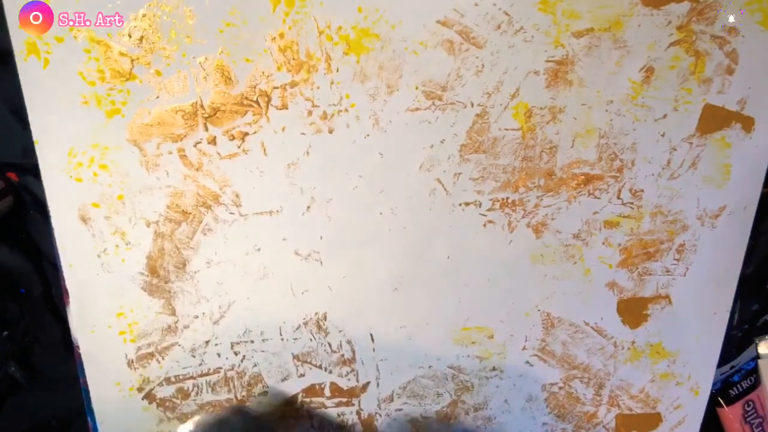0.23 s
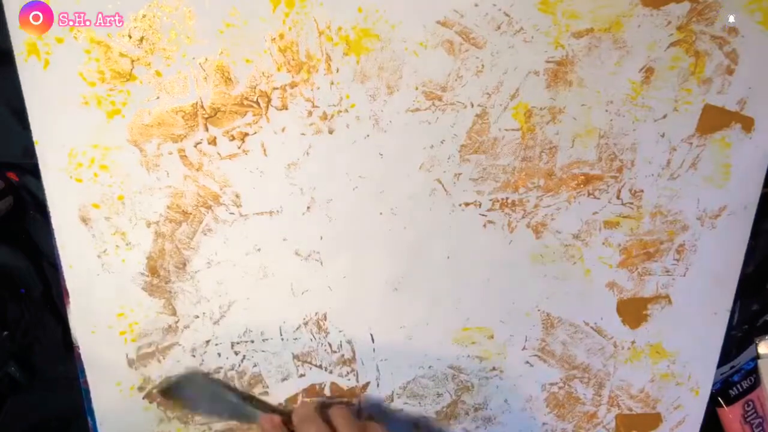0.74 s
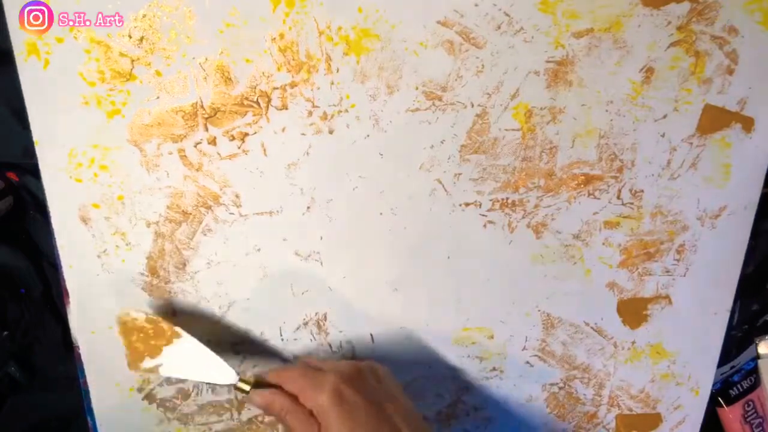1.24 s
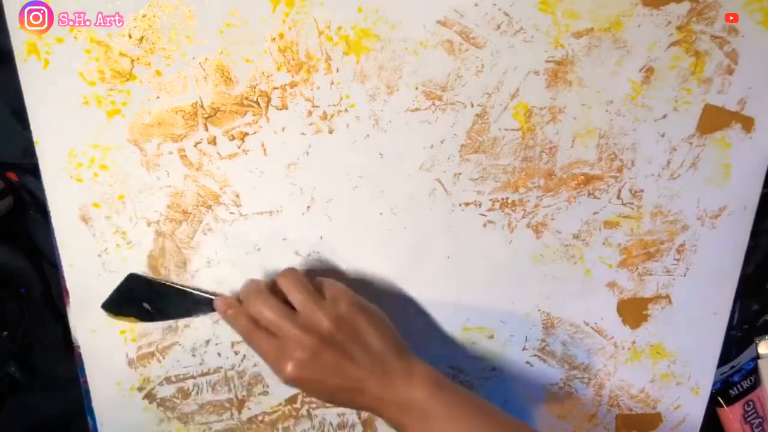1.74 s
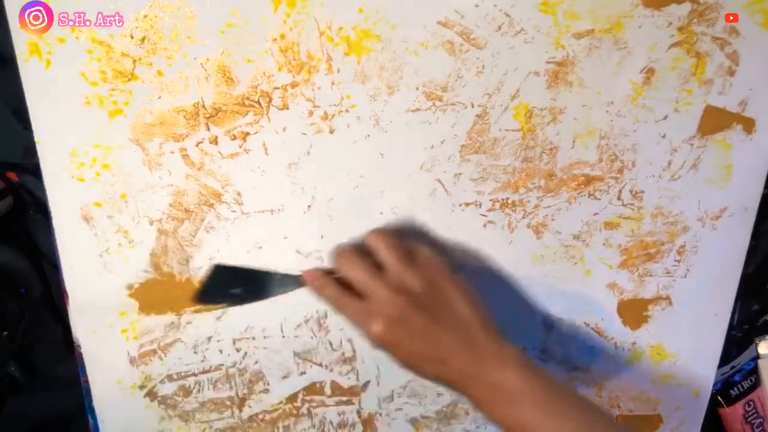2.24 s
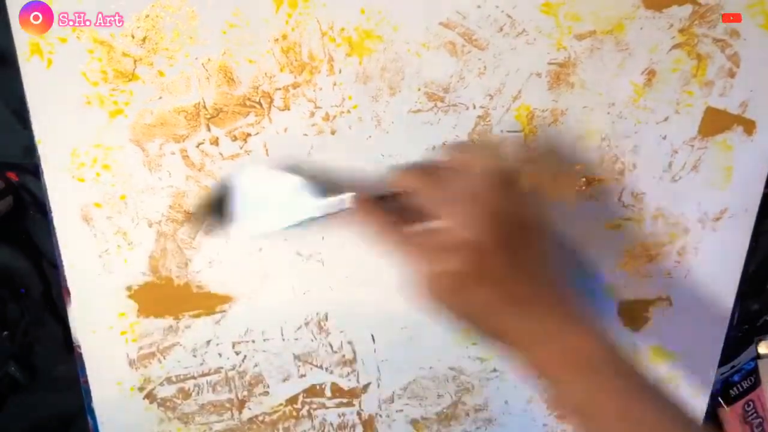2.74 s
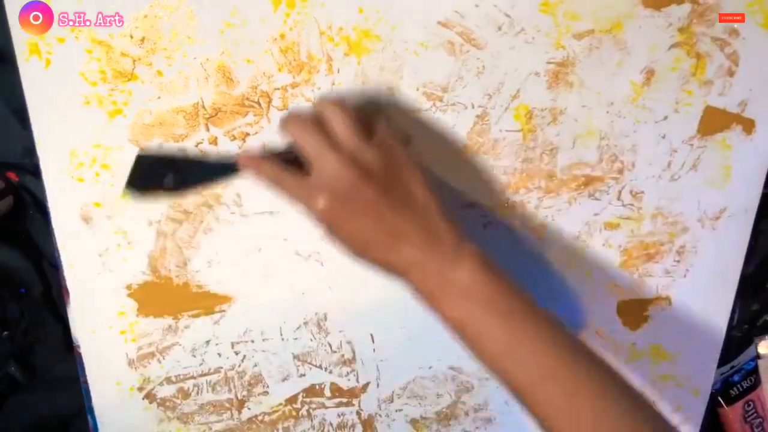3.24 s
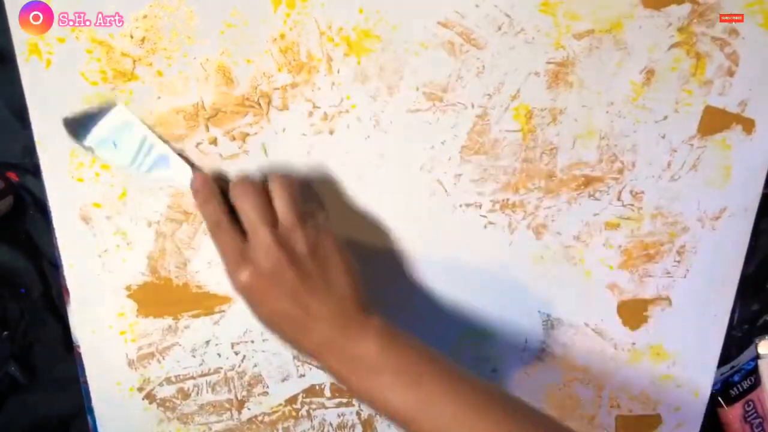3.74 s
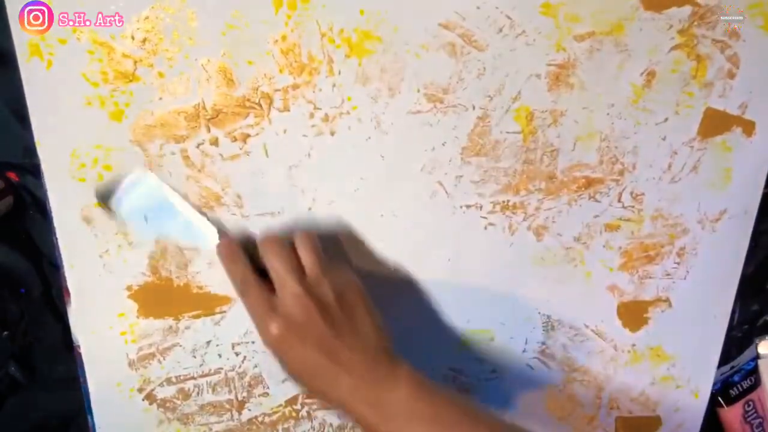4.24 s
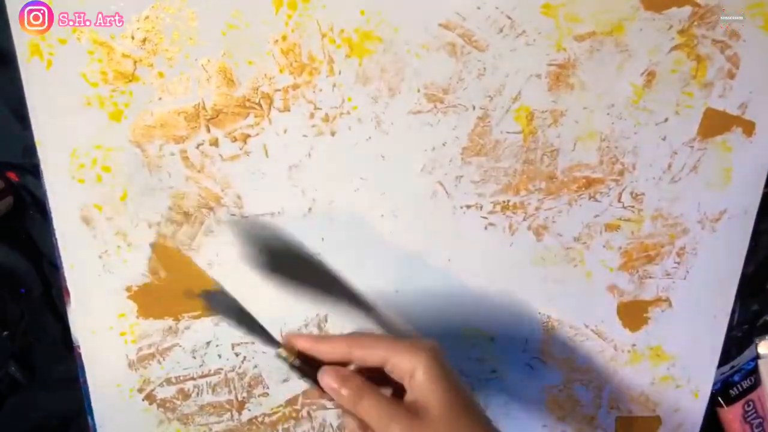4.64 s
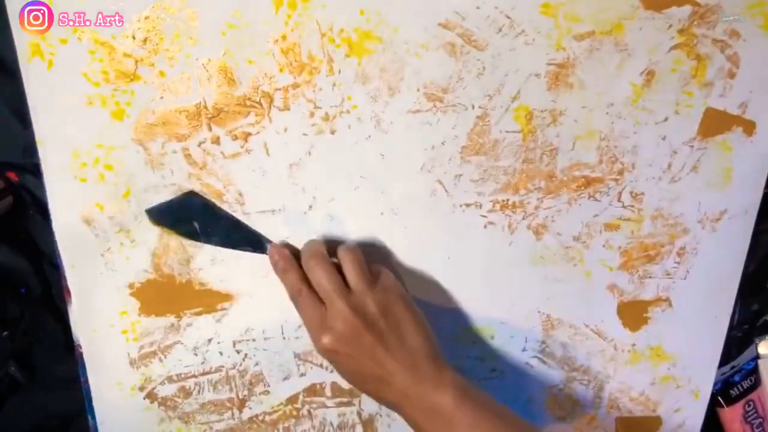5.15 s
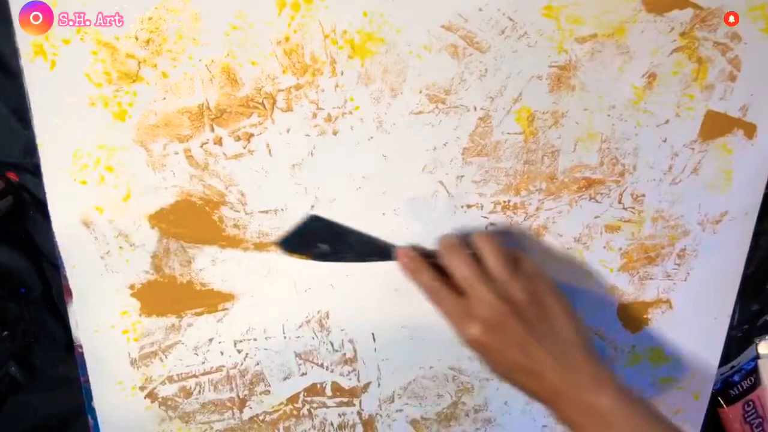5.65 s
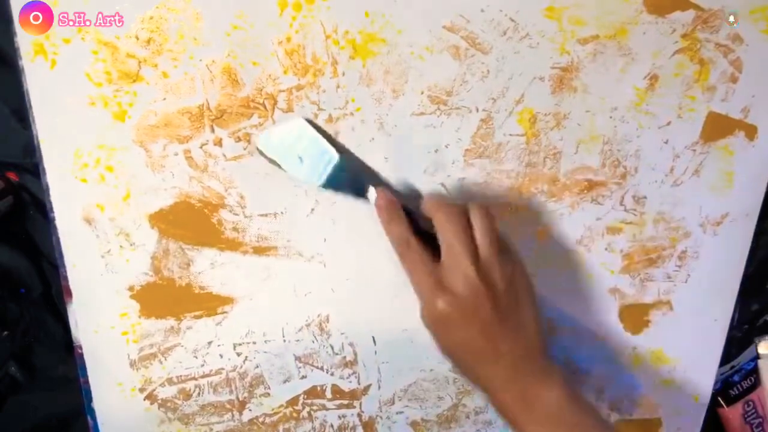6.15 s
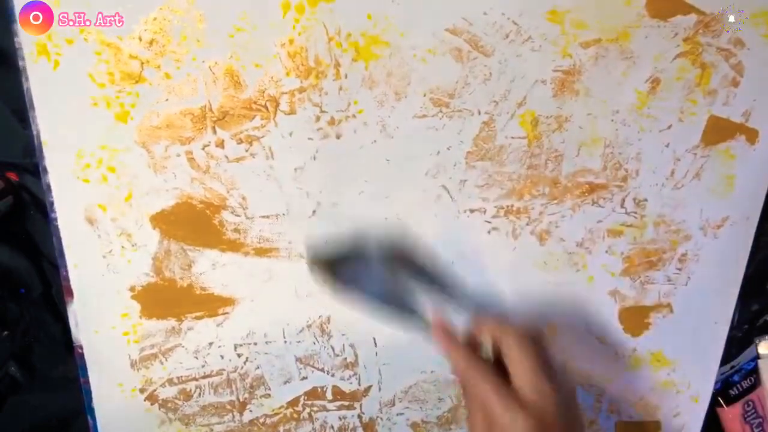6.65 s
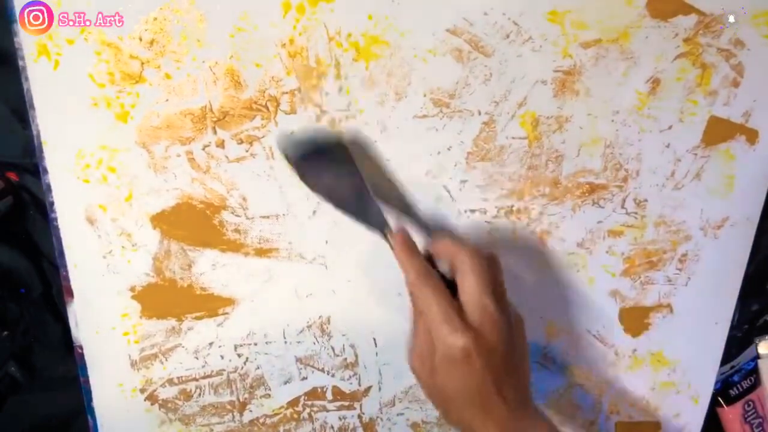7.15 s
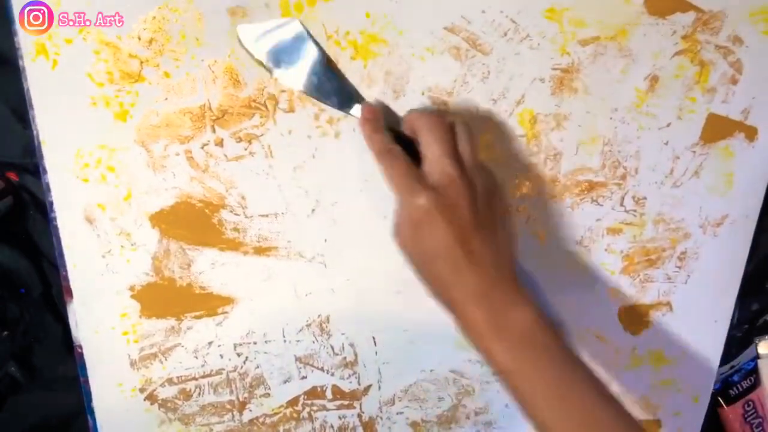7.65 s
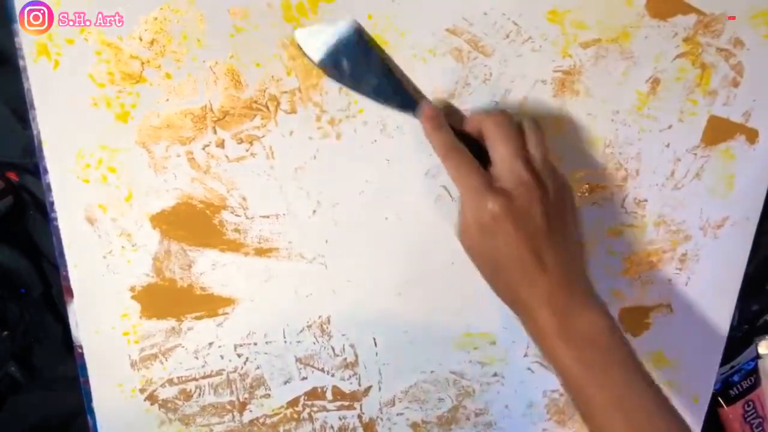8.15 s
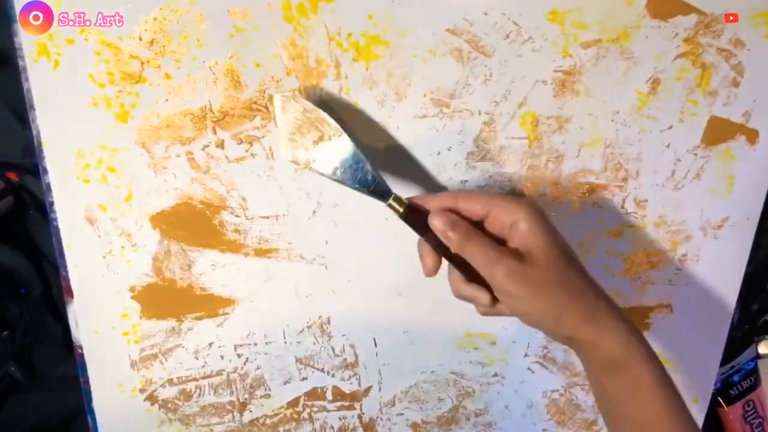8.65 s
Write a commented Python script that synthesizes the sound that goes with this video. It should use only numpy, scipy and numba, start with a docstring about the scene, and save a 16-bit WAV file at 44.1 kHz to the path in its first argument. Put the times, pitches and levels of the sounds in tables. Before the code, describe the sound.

A small, quiet room hums faintly throughout, heard from close above a table. In the first second a steel palette knife drags paint lightly over stretched canvas twice, with a sharp tap at about 0.5 seconds. More taps and short skids cluster between 1.6 and 2 seconds, each a metallic tick with a hollow, drum-like knock. From 2 seconds the strokes dig in: short, gritty rasps that swell and stop as the blade lifts, peaking near 2.6, 3.3, 4.3, 5.8, 6.4 and 7.1 seconds. The fastest ones buzz briefly over the weave. Taps fall between the strokes, with a strong one near 4.9 seconds, and fingers faintly brush the handle now and then. A softer scrape follows around 7.7 seconds. A hard tap at 8 seconds opens the last light stroke, and two faint finger brushes close the scene.

```python
"""A quiet small room hums throughout, heard by a phone above the table. A steel palette knife first
drags paint lightly over a stretched canvas: dense slips of its edge drive the drum-like cloth and the
thin blade. Then come sharp taps, fingers brushing the handle and short skids. From 2 s the strokes dig
in, and on the fastest the edge hops from thread to thread and hums. A hard tap near 8 s opens the last
light stroke, and two faint finger brushes close the scene."""
import sys
import numpy as np
from scipy import signal
from scipy.fft import rfft, irfft
from scipy.io import wavfile
from scipy.ndimage import uniform_filter1d
from numba import njit

SR = 44100
rng = np.random.default_rng(int(sys.argv[2]) if len(sys.argv) > 2 else 0)


def transcribe(u):
    """Save the signal u as a 16-bit wav file named by the first command-line argument.

    u: samples, shape (n,) or (channels, n), limited to [-1, 1]; the rate is SR.
    q: integer samples, one column per channel.
    """
    v = np.clip(np.atleast_2d(u).T, -1, 1)
    q = np.round(v * 32767).astype(np.int16)
    wavfile.write(sys.argv[1], SR, q)


N = 392490


def undb(db):
    return 10 ** (np.asarray(db) / 20)


def unit(x):
    return x / np.sqrt(np.mean(x ** 2))


def add(out, start_s, sound):
    i = int(start_s * SR)
    out[i:i + len(sound)] += sound[:N - i]


def walk(per_s):
    """Smooth random modulation with a spread near 1."""
    hold = int(SR / per_s)
    steps = np.repeat(rng.standard_normal(N // hold + 1), hold)
    return 1.3 * uniform_filter1d(uniform_filter1d(steps, hold), hold)[:N]


def band(x, lo_hz, hi_hz):
    sos = signal.butter(2, [lo_hz, min(hi_hz, .45 * SR)], "band", fs=SR, output="sos")
    return signal.sosfilt(sos, x)


def colour(x, curve):
    """EQ a noise along (Hz, dB) points, at unit RMS."""
    hz, db = np.transpose(curve)
    bins_hz = np.arange(len(x) // 2 + 1) * SR / len(x) + 1
    return unit(irfft(rfft(x) * undb(np.interp(np.log(bins_hz), np.log(hz), db)), len(x)))


def patchy(x, lo_hz, hi_hz, drift_db, count):
    """Bands that each swell on their own, kept in phase so that they join without notches."""
    edges = np.geomspace(lo_hz, min(hi_hz, .45 * SR), count + 1)
    cuts = (signal.butter(2, e, "band", fs=SR, output="sos") for e in zip(edges, edges[1:]))
    return unit(sum(undb(drift_db * walk(17)) * signal.sosfiltfilt(cut, x) for cut in cuts))


def mode(x, hz, t60):
    """One damped resonance; its gain to noise does not depend on the decay."""
    r = np.exp(-np.log(1000) / (t60 * SR))
    poles = [1, -2 * r * np.cos(2 * np.pi * hz / SR), r * r]
    return signal.lfilter([1, 0, -1], poles, x) * np.sqrt(1 - r)


def near(hz, focus_hz, fall_db):
    """Gain of a mode: full at the driven focus, fall_db weaker an octave away."""
    return undb(-fall_db * np.log2(hz / focus_hz) ** 2)


@njit
def swept_band(x, hz, q):
    """State-variable band-pass whose centre moves; gain 1 at the centre."""
    y, band_state, low_state = np.empty(len(x)), 0., 0.
    for i in range(len(x)):
        g = np.tan(np.pi * hz[i] / SR)
        v = (band_state + g * (x[i] - low_state)) / (1 + g * (g + 1 / q))
        band_state, low_state, y[i] = 2 * v - band_state, low_state + 2 * g * v, v / q
    return y


# EQ of the room tone: (frequency [Hz], relative level [dB])
ROOM_EQ = [(24, 1), (40, -11), (124, -2), (147, -4.5), (220, -5.5), (329, -11), (363, -4.5), (402, -11),
           (455, -8), (646, -11.5), (965, -12.5), (2770, -26), (16000, -35)]
ROOM_DB = -64.5


def room_tone():
    """A bed of low hum and hiss, wavering a little."""
    level = undb(ROOM_DB + .5 * walk(1.5))
    return level * patchy(colour(rng.standard_normal(N), ROOM_EQ), 25.5, 14500, drift_db=1.6, count=12)


# one envelope a stroke, touch to lift: (time [s], level [dB], rasp over that level [dB])
STROKE_ENVELOPES = [
    [(0.0, -56.5, -4.5), (0.048, -60.5, -6), (0.064, -49.5, -10.5), (0.086, -52, -15), (0.098, -55, -11.5),
     (0.11, -53, -11), (0.118, -55, -8)],
    [(0.475, -64, -17), (0.499, -49, -3), (0.619, -51.5, -11.5), (0.629, -57, 0), (0.641, -49.5, -9.5),
     (0.695, -61.5, -8), (0.727, -55, -11), (0.742, -62, -7)],
    [(2.02, -59.5, -2), (2.188, -59.5, -9), (2.194, -54.5, -12), (2.29, -54.5, -6), (2.574, -41.5, -9),
     (2.604, -32.5, -9.5), (2.62, -46, -6.5)],
    [(3.02, -62, -4.5), (3.152, -50.5, -8.5), (3.158, -49, -4.5), (3.194, -46.5, -10), (3.204, -46.5, -10),
     (3.23, -45.5, -3.5), (3.332, -40.5, -3.5), (3.345, -48.5, -7.5)],
    [(3.695, -67, 0), (3.709, -58.5, -5), (3.763, -49, 0.5), (3.811, -47.5, 1.5), (3.981, -48.5, -6.5),
     (4.001, -50.5, 0), (4.015, -45.5, -5.5), (4.022, -51, -4.5)],
    [(4.195, -46, -13), (4.207, -45.5, -7.5), (4.229, -46, -1.5), (4.291, -42, -1), (4.313, -35.5, -4),
     (4.327, -48.5, 0), (4.335, -39.5, -12.5), (4.342, -52.5, -8)],
    [(5.21, -66, -4), (5.352, -46, -13), (5.47, -50.5, -9.5), (5.542, -59.5, -5), (5.61, -60.5, -1.5),
     (5.778, -45, -12), (5.808, -41, -10), (5.83, -49, 0)],
    [(6.115, -59, -17), (6.135, -65, -2.5), (6.201, -48.5, -9), (6.285, -44.5, -5), (6.293, -46.5, 4),
     (6.329, -44.5, -2), (6.531, -45, -2), (6.558, -49.5, -5.5)],
    [(6.89, -66, -10), (6.902, -64, -4), (6.928, -48.5, -1.5), (6.986, -43, 1.5), (7.006, -39, -3),
     (7.026, -42, 1), (7.078, -38, -2), (7.092, -46, -7.5)],
    [(7.447, -66, 0), (7.455, -58, 0), (7.581, -68, -1), (7.591, -85, 6), (7.615, -64.5, 1.5),
     (7.787, -48, -4), (7.803, -49.5, 1), (7.82, -50.5, -5)],
    [(8.025, -60, -19), (8.047, -60, -7), (8.091, -56, -2.5), (8.181, -49.5, -12.5), (8.211, -55, -5.5),
     (8.222, -59, -2)],
]
# how the blade lies, a row a stroke: (hiss over rasp at start [dB], at end [dB], hiss flick at lift [dB],
# tilt to the pinned cloth at lift [dB], canvas focus [Hz], blade focus at start [Hz], at end [Hz])
BLADE_HOLDS = [(-2.5, -13, 2, 0, 820, 3500, 3400), (-8, -1, 0, 0, 754, 2300, 2400),
               (-2, -11, 15.5, 10, 680, 3900, 2950), (-4.5, -11.5, 5, 6, 757, 4400, 2700),
               (-8, -7, 0, -2, 814, 3700, 2600), (-9.5, -5, 6.5, 0, 914, 4000, 3400),
               (-4.5, -4, 2, 3, 740, 3200, 3600), (-8.5, -5, 0, 1, 836, 2840, 3540),
               (-8.5, -6, 6, 0, 822, 2970, 2660), (-7, -11, 0, 1, 728, 5000, 2640),
               (-5, -11.5, -4, 3, 680, 3200, 2700)]
LIFT_DB_PER_S, LIFT_S, FLICK_S, SWELL_S = 1000, .05, .02, .08
CANVAS_OCT_PER_DB, MEAN_RASP_DB = 0.0427, -7.5  # brighter moments drive higher canvas modes
WANDER_OCT, WANDER_PER_S = .05, 12  # each focus drifts as the grip changes


def strokes():
    """The knife drags through paint: stroke envelopes, laid over those of the skids, play the scrape."""
    t = np.arange(N) / SR
    gain, rasp_db, hiss_db, canvas_hz, blade_hz = skid_envelopes()
    pin_db = np.zeros(N)
    for envelope, hold in zip(STROKE_ENVELOPES, BLADE_HOLDS):
        times, level_db, treble_db = np.transpose(envelope)
        first_db, last_db, flick_db, swell_db, focus_hz, first_hz, last_hz = hold
        on = (t >= times[0]) & (t < times[-1] + LIFT_S)
        to_lift_s = times[-1] - t[on]
        gain[on] = undb(np.interp(t[on], times, level_db) + LIFT_DB_PER_S * np.minimum(to_lift_s, 0))
        rasp_db[on] = np.interp(t[on], times, treble_db)
        flick = flick_db * np.exp(-(np.maximum(to_lift_s, 0) / FLICK_S) ** 2)
        hiss_db[on] = rasp_db[on] + np.linspace(first_db, last_db, on.sum()) + flick
        pin_db[on] = swell_db * np.exp(-(np.maximum(to_lift_s, 0) / SWELL_S) ** 2)
        canvas_hz[on] = focus_hz * 2 ** (CANVAS_OCT_PER_DB * np.clip(rasp_db[on] - MEAN_RASP_DB, -8, 8))
        blade_hz[on] = np.geomspace(first_hz, last_hz, on.sum())
    canvas_hz *= 2 ** (WANDER_OCT * walk(WANDER_PER_S))
    blade_hz *= 2 ** (WANDER_OCT * walk(WANDER_PER_S))
    return scrape(uniform_filter1d(gain, size=128), rasp_db, hiss_db, pin_db, canvas_hz, blade_hz)


# EQ of the slips heard straight off the edge: (frequency [Hz], relative level [dB])
EDGE_EQ = [(940, 9), (1600, -1.5), (2120, -11), (2940, -9), (3490, -14), (4490, -5), (8390, -15.5),
           (12000, -16), (16000, -20.5)]


def scrape(gain, rasp_db, hiss_db, pin_db, canvas_hz, blade_hz):
    """Slips drive the canvas for body and the blade for rasp, and are heard directly as grit and hiss."""
    force = slips()
    drum = canvas_drum(force * gain * undb(-pin_db / 2), canvas_hz)
    # the patch of cloth pinned by the blade sings at a pitch that follows the canvas focus
    pinned = swept_band(force * gain * undb(pin_db / 2), canvas_hz, q=18.)
    pinned /= np.std(swept_band(force, canvas_hz, q=7.7))
    steel = blade_ring(force, blade_hz)
    edge = colour(force, EDGE_EQ)
    grit = patchy(edge, 1500, 6500, drift_db=2., count=9)
    hiss = gain * undb(hiss_db) * patchy(edge, 6500, 17000, drift_db=2., count=9)
    rasp = gain * undb(rasp_db) * (steel + undb(-4.5) * grit)
    return undb(1.5) * drum + undb(-5.5) * pinned + hand_echo(rasp) + hiss


def slips(per_s=6000, scatter_db=4., patchy_db=1.5):
    """The edge catches threads and paint ridges: dense clicks in patches; paint cushions the largest."""
    hit = rng.random(N) < per_s / SR
    size = undb(scatter_db * np.clip(rng.standard_normal(N), -2, 2) + patchy_db * walk(90))
    clicks = hit * np.sign(rng.standard_normal(N))
    return unit(size * (clicks + 0.43 * rng.standard_normal(N)))


# drum modes of the stretched canvas: (frequency [Hz], decay t60 [s], level [dB])
CANVAS_MODES = [(224.5, 0.16, -0.5), (301.2, 0.13, -1.5), (354.6, 0.091, -1), (449.4, 0.049, 1.5),
                (546, 0.055, -2.5), (601.5, 0.06, 0), (700, 0.062, -6), (788, 0.039, -2), (891, 0.031, -3),
                (1010, 0.02, -1), (1143, 0.023, -0.5), (1301, 0.012, 0), (1490, 0.016, -3.5),
                (1554, 0.039, -17.5)]


def canvas_drum(force, focus_hz):
    """The cloth resonates like a drumhead, most near the focus, and rings on when the blade lifts."""
    weights = [undb(db + 2.5 * walk(14)) * near(hz, focus_hz, 6.) for hz, _, db in CANVAS_MODES]
    total = np.sqrt(sum(w ** 2 for w in weights))
    return sum((-1) ** k * mode(force * weights[k] / total, hz, t60)
               for k, (hz, t60, _) in enumerate(CANVAS_MODES))


# bending modes of the steel blade: (frequency [Hz], decay t60 [s], level [dB])
BLADE_MODES = [(2207, 0.046, 0.5), (2390, 0.01, 6), (2713, 0.0079, 2), (3050, 0.028, -3), (3550, 0.0046, 2),
               (3950, 0.016, -2.5), (4440, 0.11, -5.5), (4990, 0.013, -8), (5420, 0.017, -1),
               (6100, 0.01, -1)]


def blade_ring(force, focus_hz):
    """The blade rings in its modes, plus one resonance that glides as bending changes its free length."""
    weights = [undb(db + 3.5 * walk(9)) * near(hz, focus_hz, 8.) for hz, _, db in BLADE_MODES]
    total = np.sqrt(sum(w ** 2 for w in weights))
    ring = sum(w * mode(force, hz, t60) for w, (hz, t60, _) in zip(weights, BLADE_MODES)) / total
    flexed = swept_band(force, focus_hz, q=8.)
    return undb(-6) * unit(ring) + undb(-13) * unit(flexed)


def hand_echo(rasp, extra_path_m=.36, echo_db=-9):
    """The rasp also bounces off the hand: a comb filter that shifts as the hand moves."""
    lag = extra_path_m / 343 * SR * (1 + .12 * walk(2.5))
    bounce = np.interp(np.arange(N) - lag, np.arange(N), rasp)
    return (rasp + undb(echo_db) * bounce) / np.hypot(1, undb(echo_db))


# the blade touches down or snags: (time [s], body peak [dB], crack over body [dB], canvas focus [Hz],
# crack focus [Hz], thud gain over body [dB])
TAP_CUES = [(0.452, -32.5, 0.5, 864, 7600, -29), (0.496, -42, -9, 573, 2730, -1),
            (0.718, -42.5, -8, 950, 4000, -36), (1.126, -57, 13.5, 500, 3200, -27),
            (1.596, -33, 3, 850, 6240, -1.5), (1.714, -29.5, 4, 478, 7000, -26),
            (1.88, -39, -11, 585, 3090, -40), (1.911, -42, -19, 980, 3270, -26),
            (1.993, -35.5, -12, 640, 5400, -42), (2.492, -42, -24, 654, 3940, -4),
            (2.851, -59.5, 6.5, 1030, 2830, -22), (2.951, -34.5, 1, 608, 2750, -9),
            (3.022, -56, -9, 484, 3070, 5), (3.158, -37, 0, 730, 3280, -29),
            (3.204, -31.5, -3, 780, 2900, -22), (3.622, -40.5, 6, 880, 5340, -38),
            (4.179, -35.5, 4.5, 412, 3500, -40), (4.89, -27, -1, 642, 3970, -8),
            (4.95, -40.5, -1.5, 486, 2530, 1), (5.099, -49, -15, 624, 2620, -1),
            (5.713, -52, 9, 711, 4830, -32), (5.826, -46, 4, 700, 2350, -40), (6.1, -40, -2, 587, 2580, 1),
            (6.867, -47, -16, 883, 4220, -21), (6.874, -44.5, 0.5, 865, 3250, -24),
            (6.937, -39, -12, 560, 3590, -22), (7.364, -38.5, 6.5, 383, 2760, -6),
            (7.45, -54, 3, 622, 3130, -17), (7.997, -25, -3, 730, 3030, -18),
            (8.23, -56, -12, 676, 2700, -10)]
THUD_HZ, THUD_FALL_S, THUD_T60_S = 240, .014, .11  # bending waves of the cloth: the lows arrive late


def taps():
    """A crack of steel with a wet tail, then a slower push: falling knock, canvas ring and late thud."""
    out, t = np.zeros(N), np.arange(SR // 4) / SR
    noises = rng.standard_normal((len(TAP_CUES), len(t)))
    late = np.clip(t - .0012, 0, None)  # the cloth answers after the edge has landed
    push = late * np.exp(-late / 0.00019)
    thud = np.sin(2 * np.pi * THUD_HZ * THUD_FALL_S * np.log(1 + t / THUD_FALL_S))
    thud *= np.exp(-np.log(1000) * t / THUD_T60_S) * (1 - np.exp(-t / 0.019))
    for (start_s, db, crack_db, canvas_hz, crack_hz, thud_db), noise in zip(TAP_CUES, noises):
        ring = sum(undb(mode_db + noise[-1 - k]) * near(hz, canvas_hz, 4.9) * mode(push, hz, t60)
                   for k, (hz, t60, mode_db) in enumerate(CANVAS_MODES))
        knock_cycles = 1.52 * canvas_hz * 0.004055 * np.log(1 + late / 0.00417)
        knock = np.sin(2 * np.pi * knock_cycles) * late * np.exp(-late / 0.0017)
        body = ring / np.abs(ring).max() + undb(-0.5) * knock / knock.max()
        body /= np.abs(body).max()
        burst = noise * (np.exp(-t / 0.0011) + undb(-24.5) * np.exp(-t / 0.017))
        steel = sum(undb(mode_db) * near(hz, crack_hz, 52.) * mode(burst, hz, t60)
                    for hz, t60, mode_db in BLADE_MODES)
        crack = band(burst, 1450, 9400) + undb(6.5) * band(burst, crack_hz, 1.11 * crack_hz)
        crack += undb(-12) * steel
        crack /= np.abs(crack).max()
        add(out, start_s, undb(db) * (body + undb(crack_db) * crack + undb(thud_db) * thud))
    return out


# fingers on the knife: (time [s], peak [dB], blade note [Hz], decay t60 [s], note over rustle [dB])
BRUSH_CUES = [(0.908, -59, 4470, 0.39, -4), (1.26, -64, 3510, 0.18, -19), (1.488, -61, 4730, 0.8, 6),
              (3.449, -58.5, 5760, 0.21, 1), (4.4285, -63, 6200, 0.16, 1), (4.582, -58, 5100, 0.16, 2),
              (4.691, -56.5, 6050, 0.14, -6), (5.143, -52, 7350, 0.32, -8), (6.0693, -57.5, 5000, 0.15, -6),
              (7.889, -52, 4400, 0.14, 6), (8.2974, -62.5, 4400, 0.11, -2), (8.7794, -66, 4550, 0.2, -16)]


def finger_brushes(attack_s=0.011):
    """Fingers brush handle and blade: faint treble rustles that each excite one blade note."""
    out, t = np.zeros(N), np.arange(SR // 3) / SR
    for start_s, db, hz, t60, note_db in BRUSH_CUES:
        noise = rng.standard_normal(len(t))
        envelope = (1 - np.exp(-t / attack_s)) * np.exp(-np.log(1000) * t / t60)
        rustle = unit(band(noise, 2300, 13000))
        note = unit(mode(noise, hz, t60=0.0054))
        brush = envelope * (rustle + undb(note_db) * note)
        add(out, start_s, undb(db) * brush / np.abs(brush).max())
    return out


# short skids: (time [s], level [dB], rasp over that level [dB], hiss over that level [dB], fade [s])
SKID_CUES = [(1.698, -48.5, -7, -20, 0.036), (1.749, -58, -4, -11, .04), (1.875, -58, -8, -13, 1),
             (2.954, -46.5, -7.5, -3.5, 0.052), (3.63, -48, -9, -18, 0.039), (4.9, -53.5, -15, -22, 0.46),
             (5.146, -56.5, -12, -8, 0.11), (7.37, -45, -5, -9, 0.048)]
SKID_ATTACK_S, SKID_FALL_DB, SKID_CANVAS_HZ, SKID_BLADE_HZ = 0.0094, 27, 733., 3160.


def skid_envelopes():
    """The blade skids as it lands or shifts: scrape controls with a fast attack and a fade."""
    t = np.arange(N) / SR
    gain, rasp_db, hiss_db = np.zeros((3, N))
    for start_s, db, skid_rasp_db, skid_hiss_db, fade_s in SKID_CUES:
        on = (t >= start_s) & (t < start_s + SKID_ATTACK_S + fade_s)
        age = t[on] - start_s
        fallen_db = SKID_FALL_DB * np.maximum(age - SKID_ATTACK_S, 0) / fade_s
        gain[on] = np.minimum(age / SKID_ATTACK_S, 1) * undb(db - fallen_db)
        rasp_db[on], hiss_db[on] = skid_rasp_db, skid_hiss_db
    return gain, rasp_db, hiss_db, np.full(N, SKID_CANVAS_HZ), np.full(N, SKID_BLADE_HZ)


# fast runs over the weave: (start [s], end [s], thread rate at start [Hz], midway [Hz], at end [Hz],
# level midway [dB])
WEAVE_RUNS = [(2.497, 2.6, 277, 282, 275, -51), (4.27, 4.34, 404, 439, 437, -44),
              (5.748, 5.828, 296, 303, 300, -54.5), (6.92, 7.109, 212.5, 480.6, 350, -43)]


def weave_hum():
    """The edge hops from thread to thread: an unsteady tone that swells and fades, with a weak octave."""
    out, t = np.zeros(N), np.arange(N) / SR
    waver, flicker = 1 + 0.018 * walk(70), undb(2. * walk(71))
    for start_s, end_s, first_hz, mid_hz, last_hz, db in WEAVE_RUNS:
        on = (t >= start_s) & (t < end_s)
        progress = (t[on] - start_s) / (end_s - start_s)
        arch = np.sin(np.pi * progress)
        hz = first_hz + (last_hz - first_hz) * progress + (mid_hz - (first_hz + last_hz) / 2) * arch
        phase = 2 * np.pi * np.cumsum(hz * waver[on]) / SR
        tone = np.sin(phase) + undb(-14) * np.sin(2 * phase)
        out[on] = np.sqrt(2) * undb(db) * arch ** 1.57 * flicker[on] * tone
    return out


def wall_reverb(x, t60=0.37, predelay_s=.005):
    """The close walls return a short, diffuse tail."""
    t = np.arange(SR // 2) / SR
    tail = band(rng.standard_normal(len(t)), 166, 5700)
    tail *= np.exp(-np.log(1000) * t / t60) * (t > predelay_s)
    return signal.fftconvolve(x, tail / np.sqrt(np.sum(tail ** 2)))[:N]


def scene():
    """The mono mix: knife up front, a touch of reverb, room tone underneath."""
    knife = strokes() + weave_hum() + taps() + finger_brushes()
    return (knife + undb(-20.5) * wall_reverb(knife) + room_tone())[None]


def record(dry):
    """The phone drops the deepest bass and cuts the top."""
    dry = signal.sosfilt(signal.butter(6, 37, "high", fs=SR, output="sos"), dry)
    return signal.sosfilt(signal.ellip(10, .2, 60, 15900, fs=SR, output="sos"), dry)


dry = scene()
out = record(dry)
transcribe(out)
```